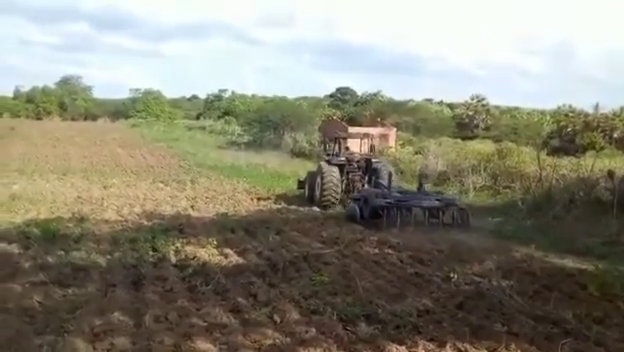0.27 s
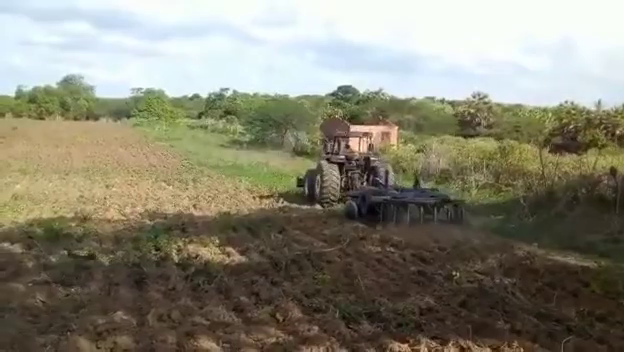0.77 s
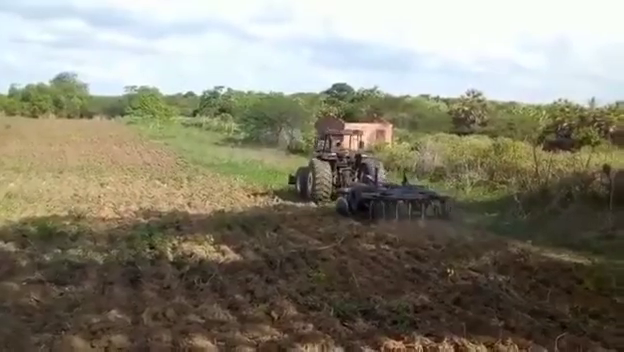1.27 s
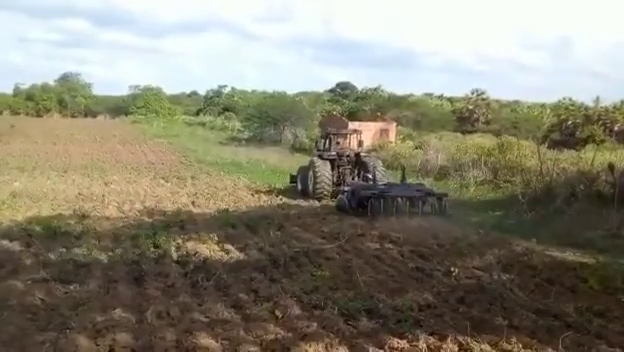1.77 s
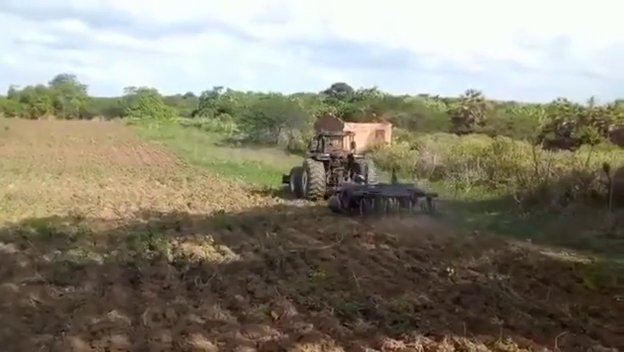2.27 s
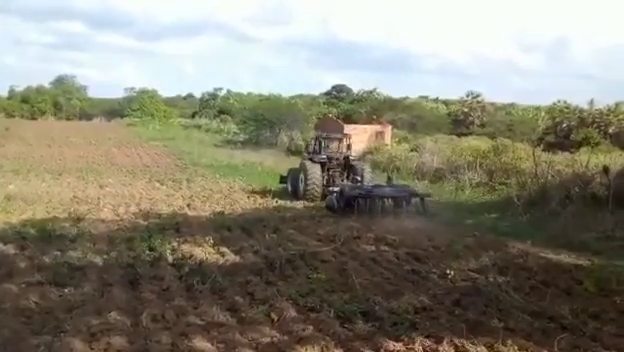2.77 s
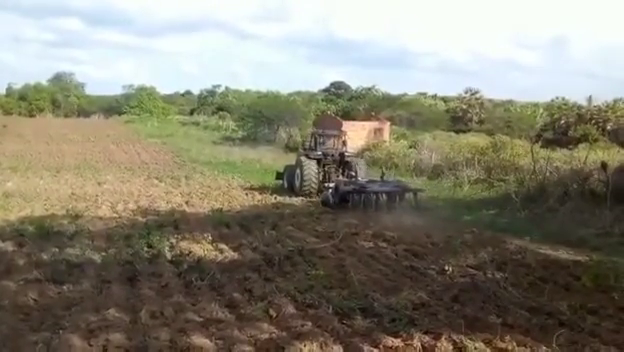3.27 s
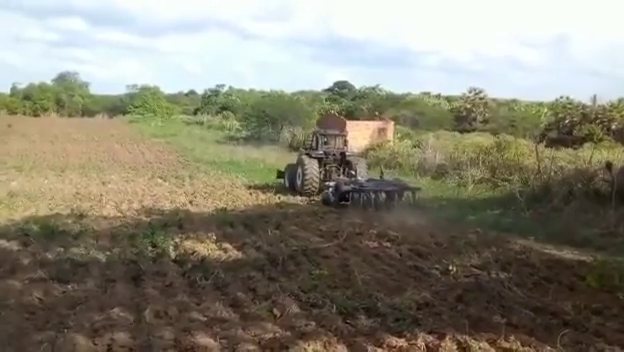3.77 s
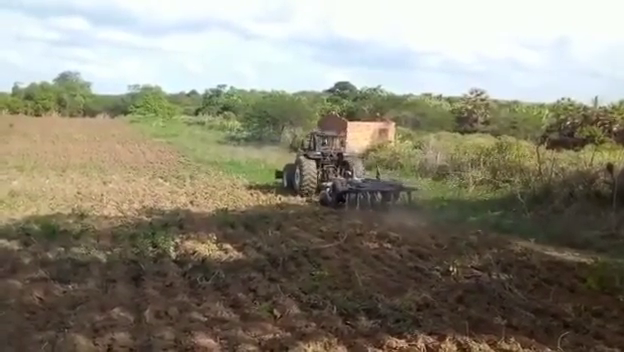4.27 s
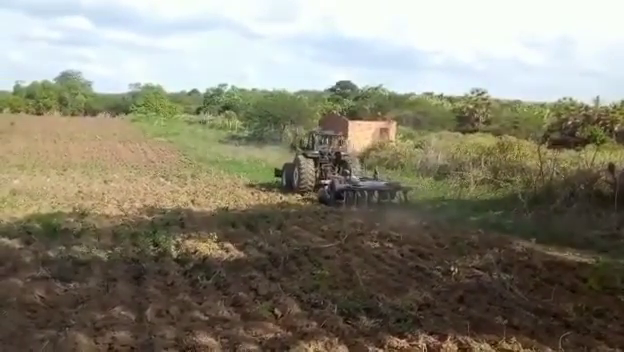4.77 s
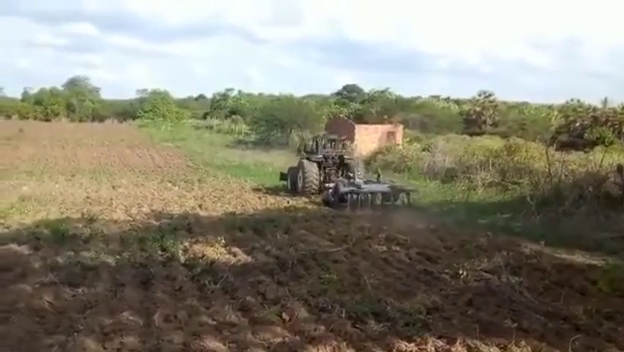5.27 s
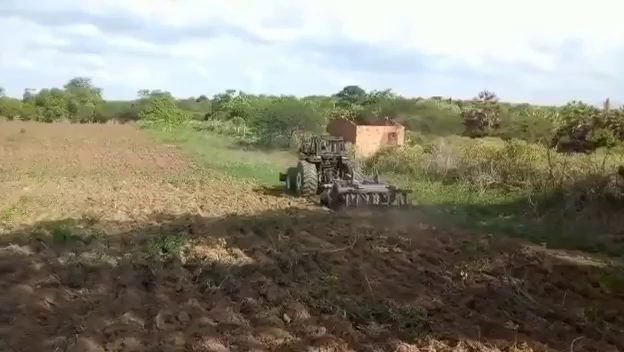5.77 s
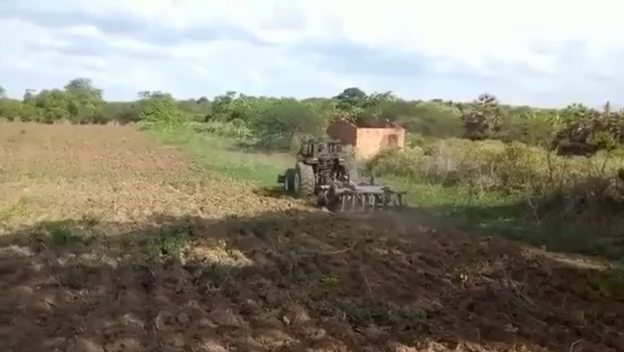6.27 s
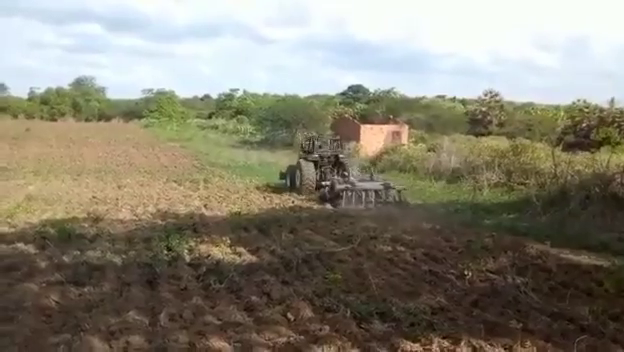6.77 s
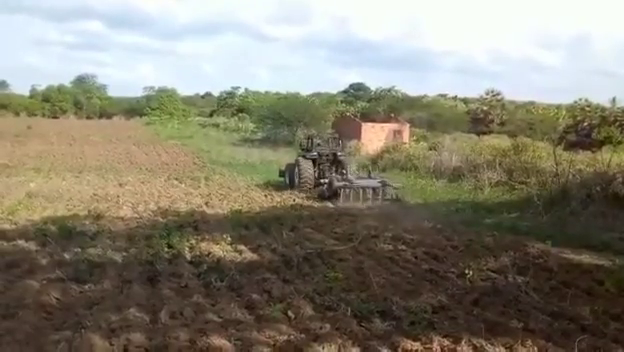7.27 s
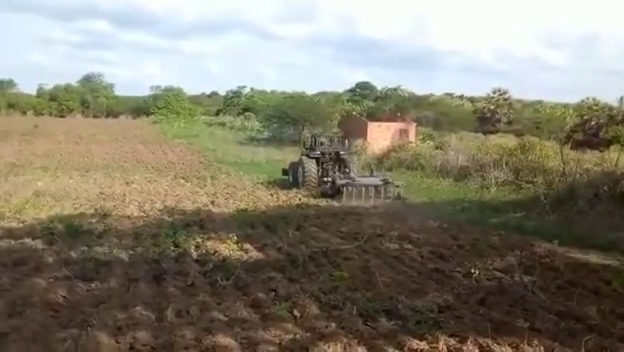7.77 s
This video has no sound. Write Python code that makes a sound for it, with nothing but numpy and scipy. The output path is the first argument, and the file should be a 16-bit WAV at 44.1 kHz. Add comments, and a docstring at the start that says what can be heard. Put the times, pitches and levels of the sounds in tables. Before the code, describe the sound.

A diesel tractor drones under load, slowly moving away, with gear whine, hissing soil, light metal knocks and one sharp dry stalk snap.

```python
"""A six-cylinder diesel tractor drags a disc harrow away across a dry, open field for 8 s.
From the start: exhaust drone at the firing rate, clatter repeating every two turns, loaded gear whine.
Under it filtered noise and random grains make the discs hiss and crumble soil; grit pings at random.
Big clods and stubble crunch from 0.4 s, the frame knocks from 1.5 s, stones squeak from 4.0 s.
At 5.1 s a dry stalk snaps: four short modes and a puff of noise. Knocks go on until 6.7 s."""
import sys
import numpy as np
from scipy import signal
from scipy.fft import rfft, irfft, next_fast_len
from scipy.io import wavfile
from scipy.ndimage import map_coordinates

SR = 44100
rng = np.random.default_rng(int(sys.argv[2]) if len(sys.argv) > 2 else 0)


def inscribe(sig):
    """Save sig as 16-bit PCM at rate SR to the path in sys.argv[1].

    A 1-D sig is mono; a 2-D sig holds one channel per row.
    Samples are clipped to [-1, 1] before scaling.
    """
    pcm = np.round(np.clip(np.atleast_2d(sig).T, -1, 1) * 32767)
    wavfile.write(sys.argv[1], SR, pcm.astype(np.int16))


N = 353241
TIME_S = np.arange(N) / SR

# Engine speed, sagging and recovering with the pull of the harrow.
# Each row: time in seconds, speed in crank turns per second.
SPEED_TURNS_PER_S = [(0.0, 23.23), (0.48, 22.88), (0.68, 23.05), (0.88, 23.75), (1.32, 22.97),
                     (1.68, 22.98), (2.0, 23.64), (3.16, 22.79), (3.52, 22.2), (4.36, 23.04), (4.68, 22.78),
                     (5.0, 23.35), (5.2, 23.16), (5.72, 23.64), (6.12, 23.49), (6.36, 23.91), (6.64, 23.56),
                     (6.84, 23.79), (7.12, 23.28), (7.36, 23.42), (7.6, 23.17), (8.0, 23.34)]
# Exhaust tones; 3 is the firing rate, its multiples are overtones, the rest come from unequal cylinders.
# Each entry: multiple of crank speed.
EXHAUST_ORDERS = [2.5, 3, 4, 5, 5.5, 6, 6.5, 9, 12, 15, 16, 18, 19.5, 23.5, 29, 34, 48]
# Each entry: level of the matching exhaust tone in dB, relative.
EXHAUST_ORDERS_DB = [-25, 1, -22.5, -16, -21.5, -12.5, -22, -28.5, -22, -22, -24, -20, -21, -22, -24.5,
                     -16.5, -27]
# Noise spectra. Each row: frequency in Hz, density in dB per Hz, relative.
RUMBLE_SPECTRUM = [(20, -28), (40, -18), (60, -14.5), (100, -7.5), (145, -4.5), (175, -12.5), (230, -18),
                   (400, -62)]
BLOCK_SPECTRUM = [(120, -25), (210, -15), (290, -7), (390, -8.5), (480, -8), (600, -3.5), (780, -1.5),
                  (900, -10), (1080, -13), (1400, -6.5), (1650, -19.5), (2400, -52)]
KNOCK_SPECTRUM = [(900, -21), (1500, 3), (1800, 1), (2200, 2), (2600, -2.5), (3200, -10), (3900, -14),
                  (4700, -32), (7000, -30)]
SOIL_SPECTRUM = [(2500, -14), (4000, -9.5), (5300, -13), (6300, -6.5), (7400, 3), (8300, -3.5), (9600, -9),
                 (11200, -9.5), (12800, -12.5), (14000, -7), (15300, -3.5)]
CRUNCH_SPECTRUM = [(1200, -22), (3000, 1.5), (4800, -14.5), (6200, -3), (7500, 7.5), (9200, -7),
                   (11000, -25)]
CRISP_SPECTRUM = [(7000, -17), (9500, -1), (11200, -1.5), (13000, 0), (15300, 9)]  # bright top of breaking stubble
# Sheet-metal panels that ring with the engine.
# Each row: mode in Hz, width in Hz, level in dB, relative.
PANEL_MODES = [(2510, 130, 0), (2790, 59, -1.5), (3140, 91, -3.5), (3623, 42, -5.5), (3665, 37, -11),
               (4135, 65, -9)]
# Swell and fade of the main gear pair's tooth tone.
# Each row: time in seconds, level in dB, relative.
WHINE_DB = [(0.0, -30.7), (0.76, -36.7), (1.16, -28.2), (1.52, -39.1), (2.68, -36.1), (3.52, -39.7),
            (3.68, -43.9), (3.84, -38.7), (5.04, -45.0), (5.28, -35.1), (5.48, -49.2), (5.8, -35.0),
            (6.2, -38.9), (6.36, -46.2), (7.04, -35.9), (7.44, -44.9), (7.64, -37.9), (8.0, -44.3)]
# Gearbox housing response; the whine's octave drops out when the engine sags below the resonance.
# Each row: frequency in Hz, gain in dB.
HOUSING_RESPONSE = [(1375, -9), (1405, -14), (1422, -0.5), (1447, 1), (1465, -0.5), (1485, -0.5)]
# Big clods and tufts of stubble crushed by the discs.
# Each row: start in seconds, crunch in dB, crisp top in dB (both relative), length in seconds.
CRUNCHES = [(0.412, -43.5, -49, 0.047), (.793, -39.5, -40, .011), (1.215, -46, -47, 0.043),
            (1.476, -36.5, -50, .014), (1.491, -44.5, -44.5, 0.071), (1.924, -44.5, -50, .028),
            (2.14, -39.5, -47, .025), (2.18, -44.5, -55, .044), (2.227, -44, -48, .05),
            (2.837, -49, -47, .061), (3.25, -48, -43, .0046), (3.967, -47.5, -47, 0.022),
            (5.064, -43, -50, .008), (5.266, -45, -52, .016), (5.376, -46, -47, 0.034),
            (5.527, -46, -45, .014), (5.997, -47, -44, .014), (6.074, -47, -41, .012),
            (6.094, -44, -53, 0.028)]
# Modes of the harrow's frame. Each row: mode in Hz, width in Hz, level in dB, relative.
FRAME_MODES = [(1350, 94, -11), (1980, 150, 6), (2560, 110, 9.5), (2820, 78, 11), (3330, 120, -6),
               (3730, 88, -10)]
# Knocks of the frame. Each row: start in seconds, level in dB (relative), length in seconds.
FRAME_KNOCKS = [(1.49, -35, .028), (2.144, -40, .015), (2.2, -35, .012), (2.237, -39, .022),
                (5.375, -40, .029), (5.495, -35.5, .015), (5.523, -34, 0.0098), (6.093, -38, .014),
                (6.197, -33.5, .024), (6.722, -36.5, .04)]
# Stones squeaking along a disc.
# Each row: start in seconds, pitch in Hz, level in dB (relative), length in seconds.
STONE_SQUEAKS = [(4.045, 7440, -45, .022), (4.052, 14800, -51, .025), (5.377, 5980, -44, .024),
                 (5.568, 7840, -39, 0.017)]
# Modes of the snapping stalk. Each row: mode in Hz, level in dB, 60 dB decay in seconds.
SNAP_MODES = [(4600, -17, .0018), (7800, -13, .0018), (11000, -7, .003), (14500, -26, .004)]

CYLINDERS = 6
START_M, AWAY_M_PER_S = 19.9, 1.0  # straight away at a walking pace
EXHAUST_LEVEL_DB, CLATTER_DB = -26.5, -33  # at the start distance
# at the start distance and working speed; slopes in dB per extra turn per second
WORKING_TURNS_PER_S = 23.17
DIESEL_KNOCK_DB, KNOCK_DB_PER_SPEED = -39.5, 1.4
HISS_DB, HISS_DB_PER_SPEED = -48, 0.6
SECOND_DB, SECOND_DB_PER_SPEED = -46, 2.5
MAIN_TEETH_PER_TURN, SECOND_TEETH_PER_TURN = 31, 28.65
# octave level at 0 dB housing gain; it gives way (dB per dB) as the tooth tone swells
OCTAVE_DB, OCTAVE_YIELD = -38.1, .18
# small clods: level, crisp top, spread either way; lengths run from half to twice CRUMB_S
CRUMB_DB, CRUMB_CRISP_DB, CRUMB_SPREAD_DB, CRUMB_S = -47.5, -48, 4, .009
FRAME_TOP_HZ = 4420  # the heavy frame hardly rings above this
SNAP_S = 5.1036
TOP_HZ = 15720


def exhaust(turns):
    """A steady firing tone with weaker, wavering overtones and odd orders, over the rumble of the gas."""
    tones = 0
    for order, db in zip(EXHAUST_ORDERS, EXHAUST_ORDERS_DB):
        waver_db = .3 if order == CYLINDERS / 2 else 2.2
        level = undb(db + waver_db * walk(12))
        tones = tones + level * np.sin(2 * np.pi * (order * turns + rng.random()))
    rumble = colour(noise(), RUMBLE_SPECTRUM)
    return undb(-0.35) * unit(tones) + undb(-15.0) * rumble


def block(turns):
    """Each firing shakes the block and bonnet; part repeats exactly, part is turbulent."""
    shake = repeating(turns) + undb(0.5) * noise()
    gated = shake * firing_gate(turns, decay=0.13, depth=0.79)
    return undb(0.86 * walk(7)) * colour(gated, BLOCK_SPECTRUM)


def diesel_knock(turns):
    """The hard, bright edge of combustion and injectors, ringing the bonnet panels."""
    gate = firing_gate(turns, decay=.2, depth=0.44)
    direct = (noise() + undb(-10) * repeating(turns)) * gate
    rattle = (noise() + undb(-10) * repeating(turns)) * gate
    panels = ring_modes(rattle, PANEL_MODES)
    edge = undb(-.5) * colour(direct, KNOCK_SPECTRUM)
    return undb(0.8 * walk(30)) * (edge + undb(-11) * unit(panels))


def gears(turns, speed, distance_db):
    """Two gear pairs whine; each firing twists the shaft and an off-centre wheel throbs once a turn."""
    tooth_db, = curves(WHINE_DB)
    housing_db = np.interp(2 * MAIN_TEETH_PER_TURN * speed, *np.transpose(HOUSING_RESPONSE))
    octave_db = OCTAVE_DB + housing_db - OCTAVE_YIELD * (tooth_db - tooth_db.mean())
    second_db = SECOND_DB + SECOND_DB_PER_SPEED * (speed - WORKING_TURNS_PER_S) + distance_db

    twist_turns = 0.00036 * np.sin(np.pi * CYLINDERS * turns) + 0.0003 * walk(45)
    throb = 1 + 0.25 * np.sin(2 * np.pi * turns) + 0.1 * np.sin(np.pi * turns)
    main = 2 * np.pi * MAIN_TEETH_PER_TURN * (turns + twist_turns)
    second = 2 * np.pi * SECOND_TEETH_PER_TURN * (turns + twist_turns)

    def tone(angle, order, db, flutter):
        """One overtone of a mesh; moving air scatters a share of it in level and phase."""
        scatter = 1 + flutter * (walk(18) + 1j * walk(19))
        return undb(db) * unit(np.imag(scatter * np.exp(1j * order * angle)))

    whine = tone(main, order=1, db=tooth_db + 1., flutter=.17)
    whine += tone(main, order=2, db=octave_db + .8 * walk(4), flutter=0.2)
    whine += tone(main, order=3, db=tooth_db / 2 - 32.5, flutter=0.8)
    whine += tone(second, order=2, db=second_db, flutter=.35)
    whine += tone(second, order=3, db=second_db - 6.0, flutter=0.38)
    return whine * throb


def discs(speed, distance_db):
    """Soil slides over the steel discs and crackles; clods and stubble give way in bursts."""
    hiss_db = HISS_DB + HISS_DB_PER_SPEED * (speed - WORKING_TURNS_PER_S) + distance_db
    sliding = undb(1.3 * walk(90)) * noise() + undb(-8.5) * grains(per_s=810, spread_db=5.0)
    hiss = undb(hiss_db + .7 * walk(18)) * colour(sliding, SOIL_SPECTRUM)

    starts_s, crunch_db, crisp_db, lengths_s = np.transpose(CRUNCHES)
    fractures = grains(per_s=7500, spread_db=5)
    small = undb(distance_db) * crumbs()
    crunch = undb(2.0) * bursts(starts_s, crunch_db, lengths_s, rise=0.046)
    crunch += undb(CRUMB_DB) * small
    crisp = undb(4.0) * bursts(starts_s, crisp_db, lengths_s, rise=0.058)
    crisp += undb(CRUMB_CRISP_DB) * small
    return hiss + crunch * colour(fractures, CRUNCH_SPECTRUM) + crisp * colour(fractures, CRISP_SPECTRUM)


def crumbs(count=52):
    """Envelope of small clods breaking at uneven gaps, each with its own size and length."""
    when, size, length = rng.random((count, 3)).T
    starts_s = (np.arange(count) + when) / count * TIME_S[-1]
    levels_db = CRUMB_SPREAD_DB * (2 * size - 1)
    lengths_s = CRUMB_S * 2 ** (2 * length - 1)
    return bursts(starts_s, levels_db, lengths_s, rise=0.045)


def frame():
    """The harrow's loose joints chatter briefly as it jolts; each tap rings the steel frame."""
    taps = grains(per_s=500, spread_db=2.0)
    ringing = ring_modes(taps, FRAME_MODES)
    muffled = signal.sosfilt(signal.butter(4, FRAME_TOP_HZ, fs=SR, output="sos"), ringing)
    return undb(-0.4) * bursts(*np.transpose(FRAME_KNOCKS), rise=0.14) * unit(muffled)


def stones(count=70):
    """Stones squeak along the discs as narrow-band noise; grit pings, each grain at its own pitch."""
    out = np.zeros(N)
    for start_s, hz, db, length_s in STONE_SQUEAKS:
        squeak = unit(resonance(noise(), hz, width_hz=260))
        out += bursts([start_s], [db], [length_s], rise=.15) * squeak
    age_s = np.arange(SR // 50) / SR
    for when, pitch, size in rng.random((count, 3)):
        hz = 6000 + 8000 * pitch
        level = undb(-44.0 + 10 * size ** 2)
        ping = level * np.exp(-age_s / 0.0009) * np.sin(2 * np.pi * hz * age_s)
        start = int(when * (N - len(age_s)))
        out[start:start + len(age_s)] += ping
    return out


def snap():
    """A dry stalk breaks with one very short, bright ring, and its fibres tear as a puff of noise."""
    age_s = np.clip(TIME_S - SNAP_S, 0, 1)
    ring = 0
    for hz, db, t60_s in SNAP_MODES:
        decay = np.exp(-np.log(1000) * age_s / t60_s)
        ring = ring + undb(db) * decay * np.sin(2 * np.pi * hz * age_s)
    fibres = undb(-35) * np.exp(-age_s / .002) * colour(noise(), CRISP_SPECTRUM)
    onset = 1 - np.exp(-age_s / .00016)
    return onset * (ring + fibres)


def firing_gate(turns, decay, depth):
    """A burst at each firing, three to a crank turn, over a steady part; decay in firing intervals."""
    return 1 + depth * np.exp(-(turns * CYLINDERS / 2 % 1) / decay)


def repeating(turns):
    """Valve and piston impacts: the same random pattern comes round every two crank turns."""
    size = 4096
    pattern = irfft(np.exp(2j * np.pi * rng.random(size // 2 + 1)))
    return unit(map_coordinates(pattern, [turns / 2 % 1 * size], order=3, mode="grid-wrap"))


def grains(per_s, spread_db):
    """Dense tiny fractures, some larger than the rest; rms 1."""
    hit = rng.random(N) < per_s / SR
    size = undb(spread_db * np.minimum(rng.exponential(size=N), 4))
    return unit(hit * size * np.sign(noise()))


def bursts(starts_s, levels_db, lengths_s, rise):
    """Envelope of short events: a quick rise over a share of the length, then a fade; powers add."""
    power = np.zeros(N)
    for start_s, db, length_s in zip(starts_s, levels_db, lengths_s):
        age = np.arange(int(4 * length_s * SR)) / (length_s * SR)  # in lengths
        shape = (1 - np.exp(-age / rise)) * np.exp(-age ** 2)
        start = int(start_s * SR)
        power[start:start + len(age)] += (undb(db) * shape[:N - start]) ** 2
    return np.sqrt(power)


def resonance(x, hz, width_hz):
    """A single mode driven by x, gain 1 at its centre."""
    return signal.lfilter(*signal.iirpeak(hz, hz / width_hz, fs=SR), x)


def ring_modes(x, modes):
    """Parallel modes of a body, all driven by x."""
    return sum(undb(db) * resonance(x, hz, width_hz) for hz, width_hz, db in modes)


def colour(x, spectrum):
    """Pass a sound through a body with the given response; rms 1."""
    hz, db = np.transpose(spectrum)
    size = next_fast_len(N)
    bins_hz = np.maximum(np.fft.rfftfreq(size, 1 / SR), 1)
    octaves_below = np.maximum(np.log2(hz[0] / bins_hz), 0)
    octaves_above = np.maximum(np.log2(bins_hz / hz[-1]), 0)
    inside_db = np.interp(np.log(bins_hz), np.log(hz), db)
    gain = undb(inside_db - 20 * (octaves_below + octaves_above))
    return unit(irfft(rfft(x, size) * gain, size)[:N])


def walk(rate_per_s):
    """Smooth random wander with about this many turns a second; spread near 1."""
    knots = rng.standard_normal(2048)
    return map_coordinates(knots, [TIME_S * rate_per_s], order=2, mode="mirror")


def noise():
    """White noise."""
    return rng.standard_normal(N)


def curves(table):
    """Each column after the time, interpolated at every sample."""
    time_s, *columns = np.transpose(table)
    return [np.interp(TIME_S, time_s, column) for column in columns]


def undb(db):
    """Decibels to gain."""
    return 10 ** (np.asarray(db) / 20)


def unit(x):
    """Scale to rms 1."""
    return x / np.sqrt(np.mean(x ** 2))


def scene():
    """Tractor and harrow in the open, no echo; 1/distance fades engine, second gears, hiss and crumbs."""
    speed, = curves(SPEED_TURNS_PER_S)
    turns = np.cumsum(speed) / SR
    distance_db = -20 * np.log10(1 + AWAY_M_PER_S * TIME_S / START_M)
    knock_db = DIESEL_KNOCK_DB + KNOCK_DB_PER_SPEED * (speed - WORKING_TURNS_PER_S)
    engine = undb(EXHAUST_LEVEL_DB) * exhaust(turns)
    engine += undb(CLATTER_DB) * block(turns)
    engine += undb(knock_db) * diesel_knock(turns)
    harrow = discs(speed, distance_db) + frame() + stones() + snap()
    return (undb(distance_db) * engine + gears(turns, speed, distance_db) + harrow)[None]


def record(dry):
    """A steep elliptic low-pass removes the top treble."""
    return signal.sosfilt(signal.ellip(10, .2, 80, TOP_HZ, fs=SR, output="sos"), dry)


dry = scene()
out = record(dry)
inscribe(out)
```